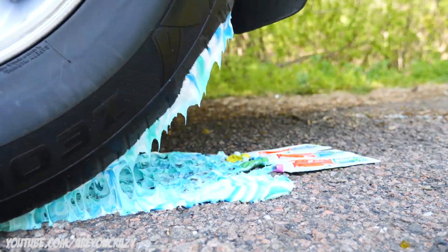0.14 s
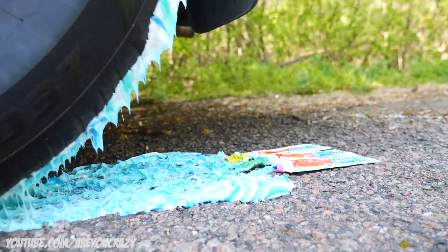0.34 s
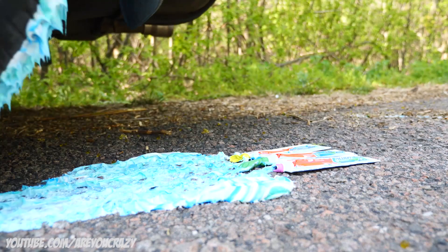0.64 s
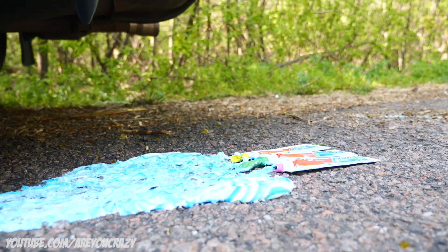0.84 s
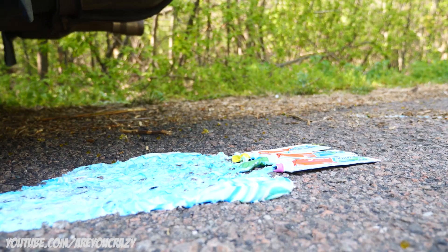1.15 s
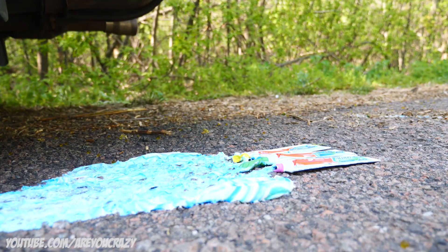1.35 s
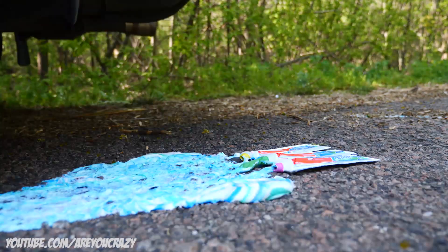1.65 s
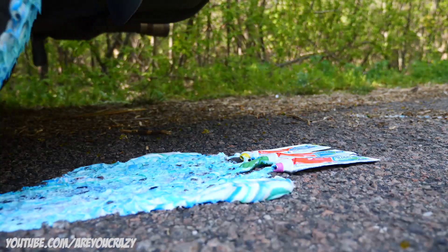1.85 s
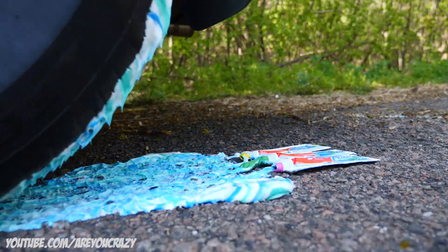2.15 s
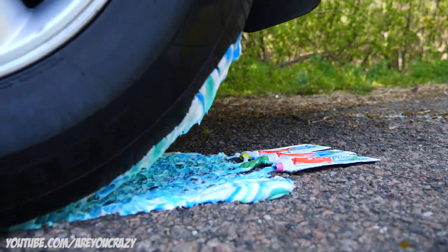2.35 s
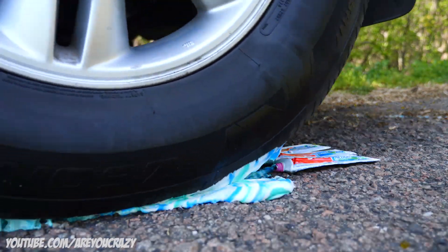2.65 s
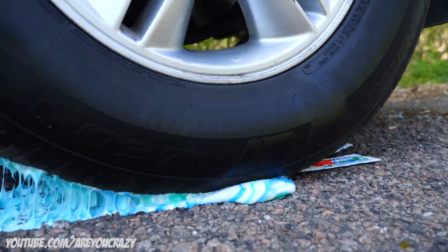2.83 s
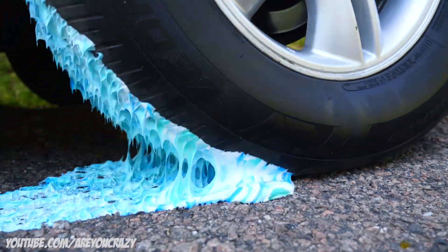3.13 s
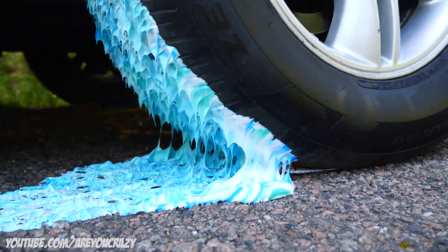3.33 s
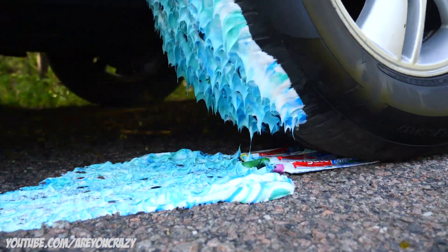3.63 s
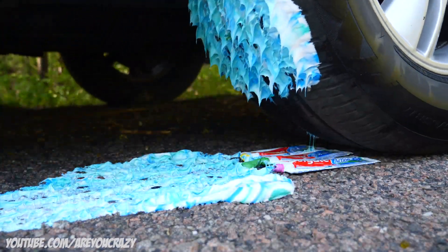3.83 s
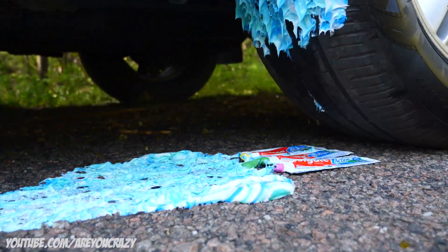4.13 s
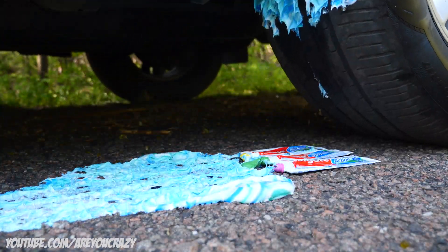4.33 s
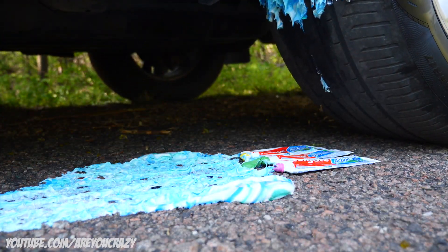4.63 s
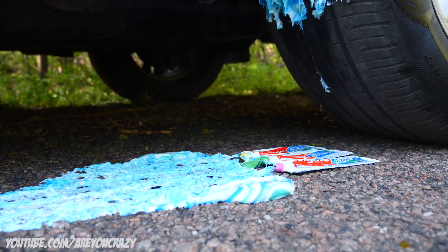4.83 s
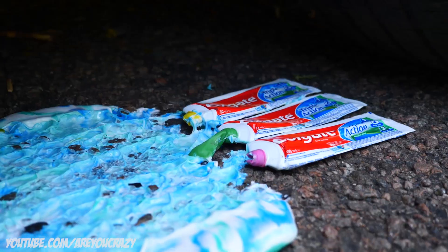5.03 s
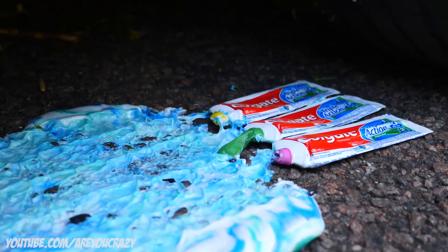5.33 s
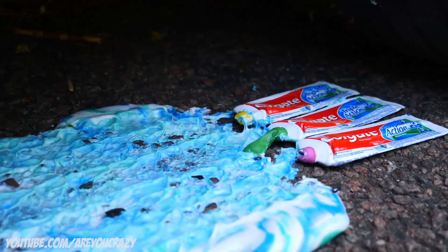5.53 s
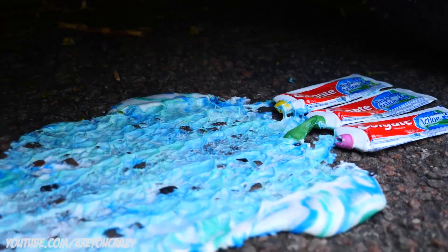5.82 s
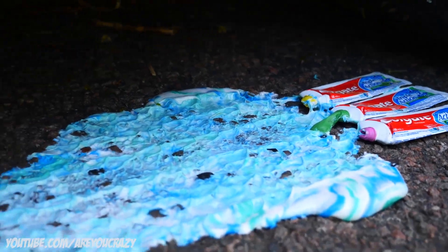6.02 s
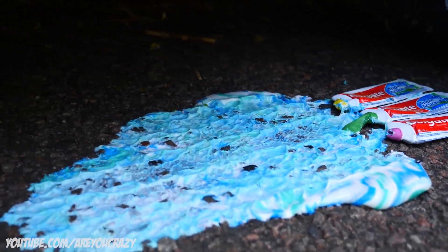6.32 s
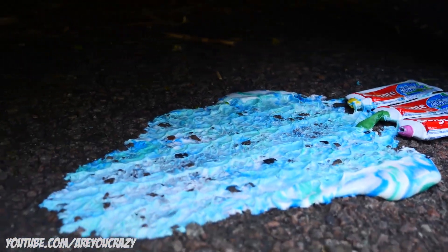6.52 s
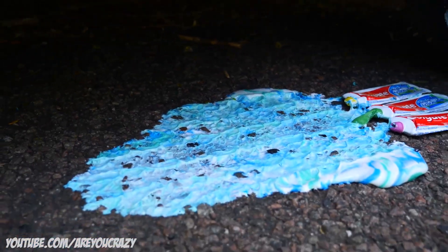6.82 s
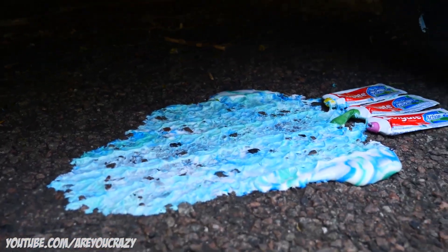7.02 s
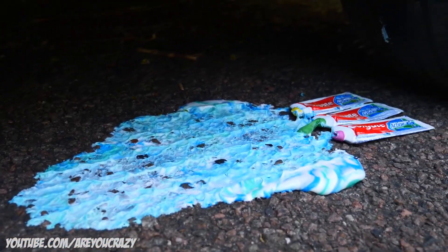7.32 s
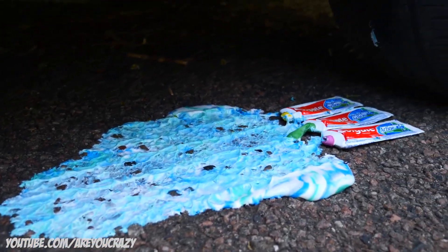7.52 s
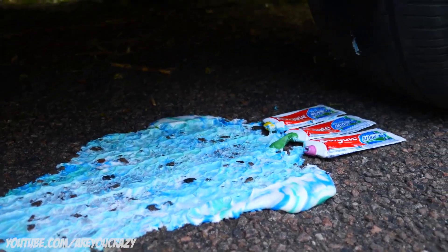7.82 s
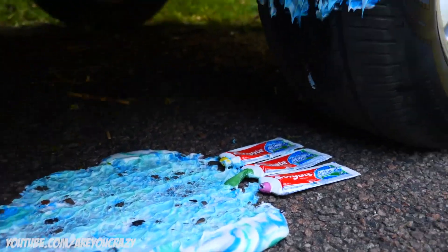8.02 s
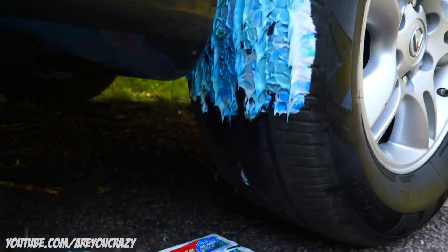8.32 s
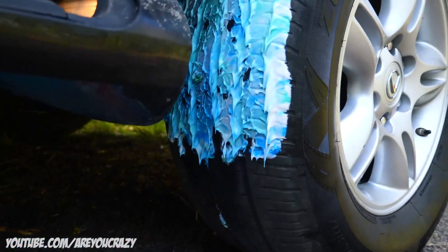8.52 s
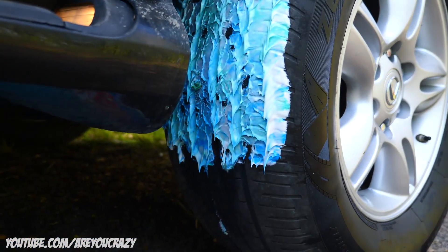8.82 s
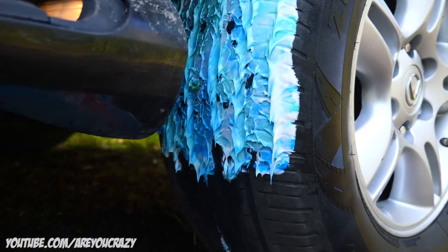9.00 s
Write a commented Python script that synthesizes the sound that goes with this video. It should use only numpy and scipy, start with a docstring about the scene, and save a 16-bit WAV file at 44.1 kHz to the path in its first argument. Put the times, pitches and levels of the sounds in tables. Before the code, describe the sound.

A car idles close by with a low hum, light rattle, fan hiss and thin belt whine. In the first half second, a few wet pops sound as toothpaste peels off a tyre. At about 1.7 seconds the engine jumps slightly, followed by a short, rough tyre scrunch. From 2.4 seconds sharp, sticky pops and fizzing build into a loud, dense crackle, thickest near 3 seconds, with a last strong pop at 3.3. The idle continues, and from 4.4 seconds something loose chatters softly under the car. At 5 seconds everything cuts to a very quiet woodland edge with distant traffic and hissing leaves. Faint birds chirp with a slight echo from 5.4 seconds, with one long, high whistle around 7. Small dry scuffs come nearby around 6 and at 8.3 seconds, and chirps continue until about 9.

```python
"""A car idles and rolls slowly back and forth over sticky toothpaste on asphalt. Air pockets pop,
froth fizzes and strings of paste tear as the tread peels off. At 1.7 s the engine sound jumps, then
a tyre scrunches. The popping is thickest near 3 s; from 4.4 s something loose chatters under the car.
At 5 s the scene changes to the quiet edge of a wood with the engine off: far traffic hums, leaves
hiss, birds whistle with echoes from the trees, and there are a few small scuffs close by."""
import sys
import numpy as np
from scipy import signal
from scipy.fft import rfft, irfft, next_fast_len
from scipy.io import wavfile
from scipy.ndimage import uniform_filter1d, map_coordinates

SR = 44100
rng = np.random.default_rng(int(sys.argv[2]) if len(sys.argv) > 2 else 0)


def generate_wav(sig):
    """Save sig (samples, or channels by samples) to the path in sys.argv[1] as 16-bit PCM at SR."""
    pcm = np.round(np.clip(np.atleast_2d(sig).T, -1, 1) * 32767).astype(np.int16)
    wavfile.write(sys.argv[1], SR, pcm)


N = 403956
T = np.arange(N) / SR

# how strongly small pockets ring as the tread peels: t/s, level/dB
PEELING = [(0, -44), (.15, -44), (.4, -62.5), (2, -61), (2.55, -40.5), (2.65, -36.5), (2.82, -33.5),
           (2.95, -29), (3.03, -25.5), (3.1, -30), (3.15, -30), (3.4, -64.5)]
MID_PEEL_DB = -38.5


def amp(db):
    """Turn decibels into a gain."""
    return 10 ** (np.asarray(db) / 20)


def unit(x):
    """Scale to an average strength (rms) of 1."""
    return x / np.sqrt(np.mean(x ** 2) + 1e-20)


def along(points, hz):
    """Read (frequency, value) points at hz, on a log frequency axis."""
    f, values = np.transpose(points)
    return np.interp(np.log(hz + 1), np.log(f + 1), values)


def curves(rows):
    """One value per sample for each column after the time."""
    times, *columns = np.transpose(rows)
    return [np.interp(T, times, column) for column in columns]


def wobble(rate):
    """A smooth curve through rate random points a second."""
    return map_coordinates(rng.standard_normal(int(N * rate / SR) + 4), [T * rate])


def filtered(x, response):
    """Give each frequency the gain response(hz)."""
    size = next_fast_len(N + 8192)
    return irfft(rfft(x, size) * response(np.fft.rfftfreq(size, 1 / SR)), size)[..., :N]


def band(x, low_hz, high_hz, order):
    """Keep what lies between two frequencies."""
    return signal.lfilter(*signal.butter(order, [low_hz, high_hz], "band", fs=SR), x)


def rush(colour, patchy_db):
    """Noise of strength 1 with the given colour and random louder and softer patches."""
    spectrum = signal.stft(rng.standard_normal(N), nperseg=512)[2]
    patches = uniform_filter1d(uniform_filter1d(rng.standard_normal(spectrum.shape), 6, 0), 10, 1)
    noise = signal.istft(spectrum * amp(patchy_db * unit(patches)), nperseg=512)[1][:N]
    return unit(filtered(noise, lambda hz: amp(along(colour, hz))))


def place(starts, sounds):
    """Add up the sounds, each beginning at its start time."""
    at = (np.asarray(starts) * SR).astype(int)[:, None] + np.arange(sounds.shape[1])
    return np.bincount(at.ravel(), sounds.ravel(), N + SR)[:N]


def tones(glides, waver):
    """One sine for each list of (t/s, f/Hz, level/dB); its pitch wanders by the share waver."""
    out = np.zeros(N)
    drift = 1 + waver * wobble(120)
    for rows in glides:
        times, hz, db = np.transpose(rows)
        span = slice(int(times[0] * SR), int(times[-1] * SR))
        t = T[span]
        fade = np.clip(np.minimum(t - times[0], times[-1] - t) / 0.0034, 0, 1)
        phase = 2 * np.pi * np.cumsum(np.interp(t, times, hz) * drift[span]) / SR
        out[span] += 2 ** .5 * fade * amp(np.interp(t, times, db)) * np.sin(phase)
    return out


def engine():
    """Six cylinders idle: the exhaust hums and puffs, parts rattle, the fan hisses, the belt whines."""
    # exhaust hum: t/s, firing rate/Hz, level at twice that rate/dB, level at three times/dB
    firing = [(0, 36.32, -50.5, -46), (1.66, 35.6, -55, -48), (1.67, 39.96, -53, -47),
              (1.88, 41.95, -48, -42.5), (2.04, 41.76, -49, -43.5), (2.5, 39.56, -46.5, -56),
              (3.04, 36.44, -49, -51), (3.4, 36.8, -50, -54), (3.9, 38.9, -50, -50), (5, 40.07, -49, -57.5)]
    # engine noise: t/s, exhaust roar/dB, engine-bay rattle/dB
    loudness = [(0, -46.5, -45.5), (.9, -47, -47), (1.66, -47.5, -51), (1.67, -40.5, -48),
                (2.1, -44, -44.5), (3.4, -41, -41), (3.9, -40, -40.5), (5, -41.5, -44)]
    # three glides of belt whine: t/s, f/Hz, level/dB
    whine = [
        [(0, 2430, -59), (.5, 2430, -63), (.75, 2430, -51), (1.0, 2392, -56.5), (1.4, 2380, -58),
         (1.66, 2410, -58.5)],
        [(1.67, 2620, -64), (2.5, 2630, -60), (2.7, 2600, -66)],
        [(3.35, 2375, -52), (3.72, 2438, -55.5), (3.95, 2506, -51), (4.2, 2556, -57.5), (4.42, 2595, -53),
         (4.6, 2560, -59), (5, 2600, -60.5)],
    ]
    # colours of the roar, the rattle and the fan: f/Hz, level/dB
    roar_colour = [(15, -58), (25, -30), (60, -9.5), (100, -6), (151, -2), (461, -3), (522, -6), (700, -11),
                   (910, -40), (1540, -120)]
    rattle_colour = [(260, -29), (450, -8.5), (765, -1.5), (1360, -5), (1530, -5.5), (1630, -4.5),
                     (2010, -8.5), (2520, -7.5), (6000, -28), (7800, -53), (13200, -120)]
    fan_colour = [(2060, -29), (3500, -3), (6200, -9), (7000, -14), (11600, -15.5), (15100, -23.5),
                  (16000, -36.5)]
    firing_hz, second_db, third_db = curves(firing)
    roar_db, rattle_db = curves(loudness)
    phase = 2 * np.pi * np.cumsum(firing_hz * (1 + .012 * wobble(8))) / SR
    shaft = phase / 3  # three firings a turn
    uneven = 1 + 0.8 * np.cos(shaft * 1.3 + 0.84 * wobble(2))  # the cylinders fire unevenly
    hum = amp(second_db + 1.2 * wobble(12)) * np.sin(2 * phase)
    hum += amp(third_db + 1.2 * wobble(14)) * uneven * np.sin(3 * phase)
    for multiple, weaker_db in (4, -9.5), (5, -12.5), (6.85, -5):
        hum += amp(second_db + weaker_db + 0.9 * wobble(8.9)) * np.sin(multiple * phase)
    roar = amp(roar_db) * unit(rush(roar_colour, patchy_db=0.17) * (1 + 0.12 * np.cos(phase)))
    once_a_turn = amp(np.cos(shaft) + 0.38 * wobble(21))
    rattle = amp(rattle_db) * unit(rush(rattle_colour, patchy_db=1.63) * once_a_turn)
    fan_db = -48 + 1.4 * (rattle_db + 40)  # fades faster than the rattle
    fan = amp(fan_db) * rush(fan_colour, patchy_db=1.5)
    belt = tones(whine, waver=.003) * amp(2.5 * wobble(40))
    return 2 ** .5 * hum + roar + rattle + fan + belt


def pockets(starts, db, hz, snap_db, cycles):
    """Each bursting air pocket snaps, rings a few cycles as it collapses and leaves a wet rattle."""
    t = np.arange(1500) / SR
    db, hz, snap_db = db[:, None], hz[:, None], snap_db[:, None]
    overtone_hz = np.minimum(hz * (2.3 + 0.22 * rng.standard_normal(hz.shape)), 6500)
    noise = rng.standard_normal((2, len(starts), len(t)))
    turns = hz * t
    ring = np.sin(2 * np.pi * turns * (1 - 12 * t)) * amp(-60 * (turns / cycles) ** 2)
    overtone_db = np.minimum(snap_db - db + 7, -4)  # stronger in sharp bursts
    overtone = np.sin(2 * np.pi * t * overtone_hz) * amp(overtone_db - 90 * (turns / cycles) ** 2)
    flutter = uniform_filter1d(uniform_filter1d(noise[0], size=28), size=16)  # blurs the pitch
    rattle = 1.25 * flutter * np.sin(2 * np.pi * np.minimum(hz, 2600) * t)
    rattle *= amp(-60 * t / 0.1 - 60 * turns / 170) * (1 - np.exp(-(t / 0.0015) ** 2))
    snap = band(noise[1] * amp(snap_db - 60 * t / 0.007), 2500, 7500, order=3)
    rise = 1 - np.exp(-2.2 * turns)
    return place(starts, amp(db) * rise * (ring + overtone + rattle) + snap)


def popping():
    """The peeling tread bursts large air pockets and a crowd of small ones."""
    # large pockets: t/s, level/dB, f/Hz, snap level/dB
    pops = [(0.033, -23, 1100, -53), (0.0477, -20.5, 1500, -54), (0.0482, -21.5, 3300, -52),
            (0.132, -16, 707, -36.5), (0.194, -22.5, 1035, -48), (0.2011, -23, 3900, -22.5),
            (0.311, -24, 1485, -48), (1.044, -30, 2020, -55), (1.989, -24.5, 1193, -52),
            (2.0693, -20, 826, -33), (2.396, -20, 1935, -41), (2.404, -31.5, 7000, -31),
            (2.475, -27.5, 1300, -41), (2.523, -21.5, 1130, -29), (2.569, -15, 3080, -17),
            (2.617, -21, 5470, -30.5), (2.628, -8, 2260, -30), (2.6352, -10, 2230, -22),
            (2.668, -26, 3300, -40), (2.683, -4, 1756, -4.5), (2.6887, -11, 1640, -16),
            (2.6977, -16.5, 2090, -19), (2.71, -10, 1480, -20.5), (2.7232, -13.5, 2270, -30),
            (2.7376, -11, 1310, -29.5), (2.745, -18, 4100, -24), (2.7523, -5.5, 3920, -23.5),
            (2.7735, -2.5, 1406, -30.5), (2.7786, -7.5, 1686, -29.5), (2.7987, -13, 1530, -24),
            (2.8418, -12.5, 2290, -28), (2.8578, -15, 1023, -28), (2.8676, -15, 1250, -29),
            (2.8847, -11.5, 1293, -13), (2.9072, -13.5, 1660, -28), (2.9352, -4.5, 4280, -12.5),
            (2.9832, -8, 1082, -19.5), (2.9879, -6, 1064, -25.5), (3.024, -5.5, 1710, -25),
            (3.026, -8.5, 1003, -14), (3.0351, 1, 1904, -15.5), (3.0444, -9.5, 1110, -25),
            (3.046, -2, 3130, -23.5), (3.0587, 2, 1687, -15), (3.0624, -9, 4000, -24),
            (3.101, -6.5, 1123, -22), (3.129, -6.5, 1400, -24), (3.1357, -10, 1410, -26),
            (3.1669, -15, 1497, -36), (3.2332, -8.5, 840, -24), (3.26, -15.5, 9390, -23.5),
            (3.3174, -8, 1362, -38.5), (3.3192, -14, 650, -49.5), (3.3366, -2.5, 760, -42.5),
            (3.3408, 1, 692.7, -22), (3.3404, -1, 1200, -40.5), (3.3541, -13, 780, -40),
            (3.3568, -15, 770, -23.5), (3.568, -34.5, 9060, -30), (3.659, -24.5, 9030, -42),
            (3.784, -18, 2094, -38), (3.7947, -19, 1950, -46)]
    large = pockets(*np.transpose(pops), cycles=6.1)
    starts = np.arange(0, 3.5, 1 / 480)
    ring_luck, delay_luck, snap_luck = rng.random((len(starts), 3)).T
    hz = 1700 * np.exp(0.49 * rng.standard_normal(len(starts)))
    peel_db = curves(PEELING)[0][(starts * SR).astype(int)]
    ring_db = peel_db - 4 * np.log(ring_luck + .05)
    snap_db = -54 + .6 * (peel_db - MID_PEEL_DB) - 3.5 * np.log(snap_luck + .05)
    small = pockets(starts + .006 * delay_luck, ring_db, hz, snap_db, cycles=5.5)
    thump = amp(-26.5) * np.exp(-((T - 3.342) / 0.0089) ** 2)  # short and low, under the loudest pop
    return band(large + small, 270, 11000, order=2) - thump  # wet pockets give little bass or top


def froth():
    """Tiny bubbles in the squeezed paste fizz in clumps while the tread peels."""
    # colour of the fizz: f/Hz, level/dB
    colour = [(700, -20), (1800, -1.5), (6000, -12), (15000, -22)]
    peel_db, = curves(PEELING)
    fizz = unit(rush(colour, patchy_db=3.5) * amp(3.5 * wobble(70) + 4.5 * wobble(600)))
    return amp(-52.5 + peel_db - MID_PEEL_DB) * fizz


def strings():
    """Each string of paste tears off the tread with a short, high fizz."""
    # tearing strings: t/s, level/dB, time to fade by 60 dB/s
    tears = [(0.1334, -44, .07), (0.8465, -49, 0.046), (2.1085, -47.5, .07), (2.3905, -45, .05),
             (2.499, -44.5, .07), (2.6964, -29.5, .012), (2.7225, -26, .012), (2.7515, -33, .012),
             (2.8417, -34, .018), (2.8847, -30, .015), (2.9751, -38, .12), (3.038, -31.5, .05),
             (3.055, -36, .05)]
    starts, db, fade_s = np.transpose(tears)
    t = np.arange(2000) / SR
    fizz = band(rng.standard_normal((len(starts), len(t))), 7000, 14300, order=2)
    shape = amp(db[:, None] - 60 * t / fade_s[:, None]) * (1 - np.exp(-t / 0.001))
    return place(starts, shape * unit(fizz))


def scrunch(start_s=1.786, rise_s=0.0087, fade_s=0.14):
    """A rough, low scrape as the tyre starts to roll back."""
    # colour of the scrape: f/Hz, level/dB
    colour = [(250, -16), (450, -2.5), (800, 0.5), (1500, -9.5), (9000, -43.5)]
    t = np.clip(T - start_s, 0, None)
    rough = unit(rush(colour, patchy_db=2.5) * amp(2.3 * wobble(150)))
    return amp(-21 - 60 * t / fade_s) * (1 - np.exp(-t / rise_s)) * rough


def chatter(growth_db_per_s=8.5, width_s=0.017):
    """Something loose under the car rattles in soft, nearly regular bursts that grow louder."""
    # bursts: t/s
    bursts = [4.4, 4.548, 4.625, 4.687, 4.752, 4.823, 4.898, 4.948]
    # colour of the rattle: f/Hz, level/dB
    colour = [(400, -32), (1100, -11.5), (1340, 1), (1480, -9), (1650, 1), (1900, -14.5), (3400, -10),
              (4000, -20), (9000, -32), (11500, -36), (16000, -49)]
    levels = -46 + growth_db_per_s * (np.array(bursts) - bursts[0])
    swell = sum(amp(db) * np.exp(-((T - at) / width_s) ** 2) for at, db in zip(bursts, levels))
    swell += amp(-49.5) * np.clip((T - 3.8) / .4, 0, 1)  # it also buzzes between bursts
    rattle = rush(colour, patchy_db=0.5)
    strength = np.sqrt(np.abs(uniform_filter1d(rattle ** 2, size=700)) + .1)
    return swell * rattle / strength


def wood_edge():
    """Far traffic hums, leaves hiss above it and a light breeze rumbles in the deep bass."""
    # background: t/s, traffic level/dB, breeze level/dB
    loudness = [(5, -70.5, -84), (6.3, -69, -81), (7.6, -70, -93.5), (8.2, -69.5, -74), (9.16, -69.5, -86)]
    # colour of traffic and leaves together: f/Hz, level/dB
    colour = [(15, -50), (25, -13.5), (223, -7), (373, -5), (560, -12.5), (1560, -17), (1790, -17),
              (3820, -20), (16000, -28.5)]
    traffic_db, breeze_db = curves(loudness)
    low_share = lambda hz: 1 / (1 + (hz / 1200) ** 4)
    air = rush(colour, patchy_db=1.2)
    leaves = amp(-76.5) * unit(filtered(air, lambda hz: 1 - low_share(hz)))
    breeze = rush([(15, -5.0), (40, 2.0), (90, -7.0), (200, -34.5)], patchy_db=1)
    breeze *= amp(breeze_db + 1.8 * wobble(2.9))
    traffic = amp(traffic_db + .7 * wobble(9)) * unit(filtered(air, low_share))
    return traffic + leaves + breeze


def far_bird():
    """A far bird repeats one raspy phrase, softly at first, and ends with a falling call."""
    # when each phrase begins: t/s
    starts = [5.4, 5.545, 5.695, 5.944, 6.075, 6.206, 6.337, 6.468, 6.597]
    # its notes: delay/s, first f/Hz, last f/Hz, length/s, level/dB
    phrase = [(0, 3130, 2600, 0.025, -75), (0.031, 3198, 3800, 0.0222, -74),
              (0.057, 3000, 2500, .018, -71.5)]
    # falling call: t/s, f/Hz, level/dB
    call = [(7.04, 3290, -89), (7.11, 2630, -76), (7.24, 2380, -84)]
    # soft start: a pair of t/s, then a pair of gain/dB
    swell = (5.75, 5.95), (-9, -2)
    glides = [[(start + delay, first_hz, db), (start + delay + length, last_hz, db)]
              for start in starts for delay, first_hz, last_hz, length, db in phrase]
    voice = tones(glides + [call], waver=.015)
    return voice * amp(wobble(30) + 3.5 * wobble(250) + np.interp(T, *swell))


def near_birds(rise_s=0.024):
    """Short gliding chirps, made raspy by a fast flutter, and one long, clear whistle."""
    # chirps: t at full voice/s, hold/s, fade/s, first f/Hz, last f/Hz, level/dB
    chirps = [(5.531, 0.00067, .055, 5433, 5234, -54), (6.589, 0.0032, 0.032, 4730, 4510, -60.5),
              (6.617, 0.051, 0.027, 3560, 4060, -65.5), (7.847, 0.024, .02, 6030, 5380, -66),
              (7.882, 0.039, 0.039, 5370, 4800, -66), (7.854, 0.042, .015, 4350, 4060, -65.5),
              (7.901, 0.026, 0.014, 4070, 4790, -66.5), (7.945, .31, .03, 4790, 4970, -75),
              (8.38, 0.031, .02, 6600, 5830, -72), (8.42, 0.0017, 0.035, 5570, 5600, -61.5),
              (8.394, 0.0067, 0.013, 5410, 4805, -61), (8.425, 0, 0.016, 4920, 4800, -62),
              (8.562, 0, 0.023, 3960, 4200, -67), (8.683, 0, .012, 5350, 5500, -73.5),
              (8.928, 0.014, 0.04, 3600, 3300, -75.5), (8.739, 0, 0.051, 4400, 4190, -60.5)]
    # long whistle: t/s, f/Hz, level/dB
    whistle = [(6.715, 5500, -80), (6.755, 5360, -57), (6.83, 5350, -59), (6.9, 5450, -65),
               (6.92, 5470, -74), (6.95, 5490, -65), (7.04, 5560, -62), (7.15, 5575, -65),
               (7.175, 5560, -85)]
    glides = []
    for at, hold, fade, first_hz, last_hz, db in chirps:
        slide_hz = last_hz - first_hz
        glides.append([(at - rise_s, first_hz, db - 24),
                       (at, first_hz + slide_hz * rise_s / (rise_s + hold), db),
                       (at + hold + 1 / SR, last_hz, db),
                       (at + hold + fade, last_hz + 0.18 * slide_hz, db - 27)])
    raspy = tones(glides, waver=.007) * amp(1.4 * wobble(35) + 3.5 * wobble(250))
    return raspy + tones([whistle], waver=.001)


def echoes(song):
    """The trees throw the song back as a haze whose treble dies first."""
    # echo length: f/Hz, time to fade by 60 dB/s
    fade_times = [(1000, 1), (10000, 0.12)]
    hz, t, spectrum = signal.stft(rng.standard_normal(SR // 2), SR, nperseg=256)
    tail = signal.istft(spectrum * amp(-60 * t / along(fade_times, hz)[:, None]), SR, nperseg=256)[1]
    return signal.fftconvolve(np.pad(song, (400, 0)), tail / np.linalg.norm(tail))[:N]


def scuffs():
    """Short, dry rubs close by: each is a burst of noise over a low knock."""
    # rubs: t/s, level/dB, f/Hz, knock level/dB
    rubs = [(5.889, -54, 3040, -64.5), (5.903, -55.5, 1886, -72.5), (6.263, -51, 2750, -49.5),
            (6.28, -53, 2800, -66), (6.306, -55, 1830, -64), (6.394, -57.5, 6100, -67),
            (6.424, -63.5, 1613, -69), (8.305, -55.5, 2210, -70)]
    t = np.arange(4000) / SR
    shape = amp(-60 * t / 0.061) * (1 - np.exp(-t / 0.0027))
    sounds = []
    for _, db, hz, knock_db in rubs:
        noise = rng.standard_normal((2, len(t)))
        rub = band(noise[0], hz * 0.37, hz * 1.36, order=3)
        knock = signal.lfilter(*signal.iirpeak(350, 1.2, SR), noise[1])
        sounds.append(shape * (amp(db) * unit(rub) + amp(knock_db) * unit(knock)))
    return place(np.transpose(rubs)[0], np.array(sounds))


def stereo_side(x):
    """What left and right do not share: a softer copy with scrambled phases."""
    # strength of the copy: f/Hz, gain/dB
    gains = [(60, -32.5), (300, -34), (1290, -29), (2380, -23.5), (4400, -17.5), (8120, -10), (15000, -10)]
    hz, _, spectrum = signal.stft(x, SR, nperseg=256)
    scrambled = spectrum * np.exp(2j * np.pi * rng.random(spectrum.shape))
    return signal.istft(scrambled * amp(along(gains, hz))[:, None], SR, nperseg=256)[1][:N]


def scene(change_s=5.0025):
    """First the car on the paste, then the edge of the wood, in stereo."""
    running = np.clip((change_s - T) / .0005, 0, 1)
    car = running * (engine() + chatter())
    paste = running * (popping() + strings() + froth() + scrunch())
    wood = (1 - running) * wood_edge()
    near, far = near_birds(), far_bird()
    birds = near + far + echoes(amp(-11) * near + amp(-6) * far)
    middle = car + paste + wood + birds + scuffs()
    # faint left-right difference: less on the pops, more on the quiet background hiss
    side = stereo_side(car + amp(-7.5) * paste + amp(13) * wood)
    return np.array([middle + side, middle - side])


def record(dry, top_hz=15900):
    """Clip the loudest pops at full scale and cut the highest treble."""
    return np.clip(filtered(np.clip(dry, -1, 1), lambda hz: hz < top_hz), -1, 1)


dry = scene()
out = record(dry)
generate_wav(out)
```